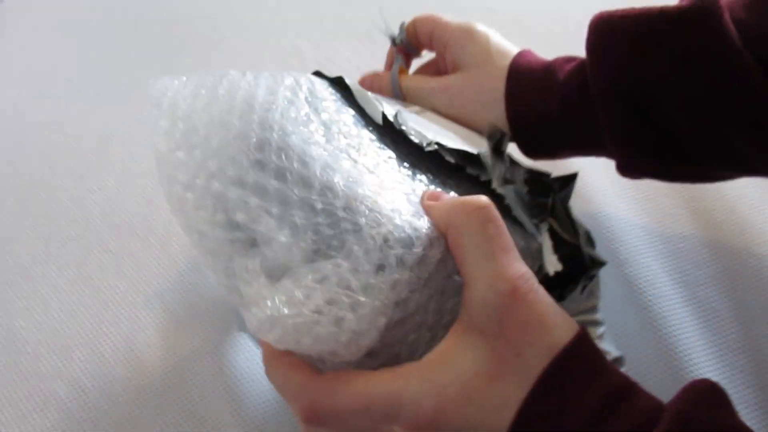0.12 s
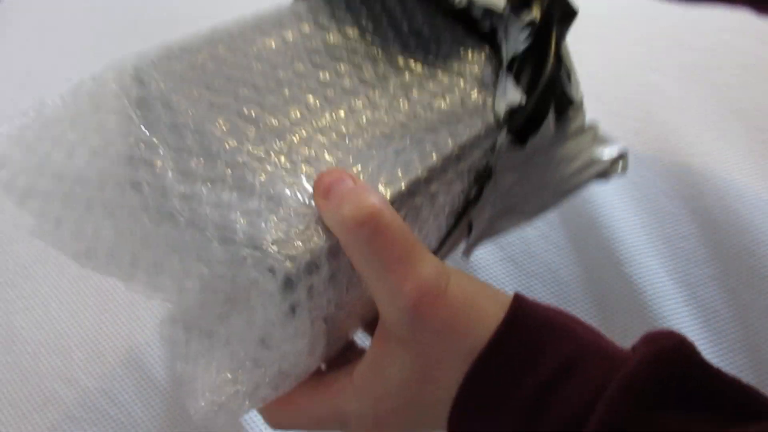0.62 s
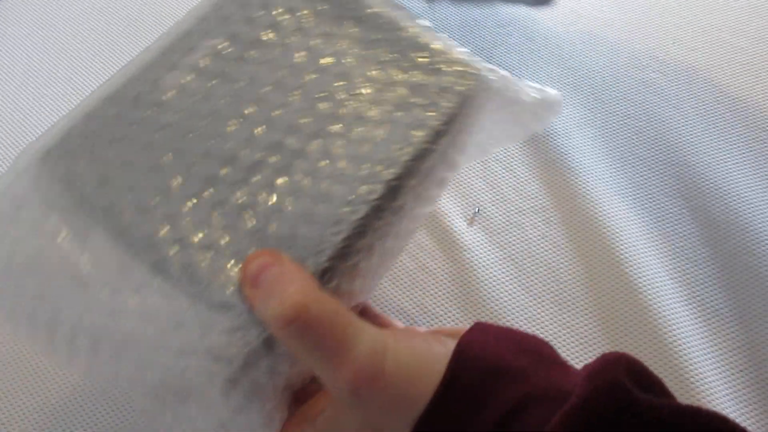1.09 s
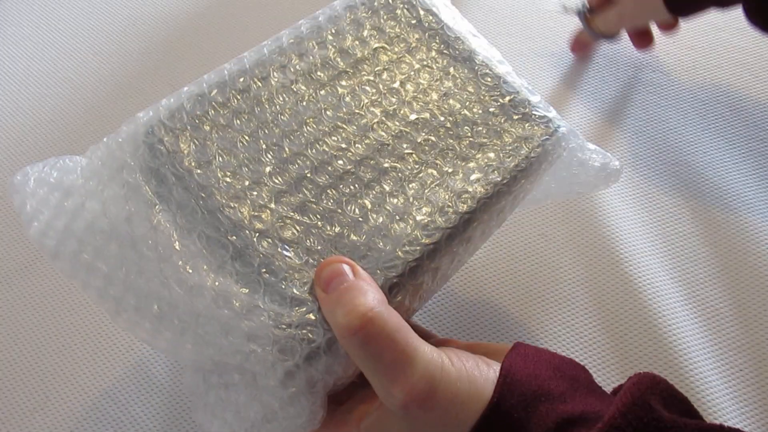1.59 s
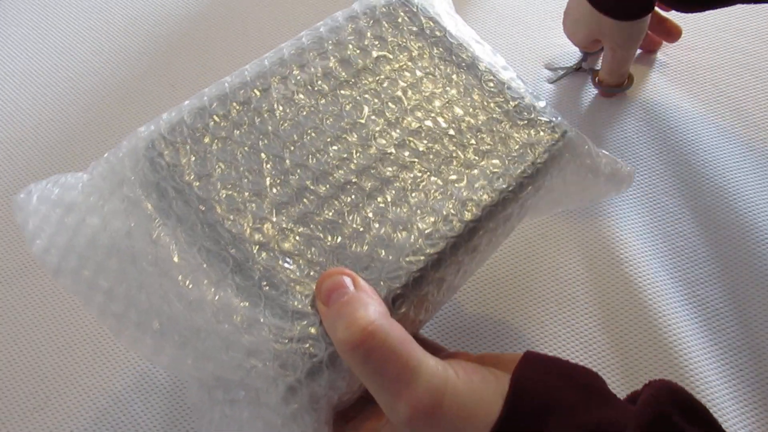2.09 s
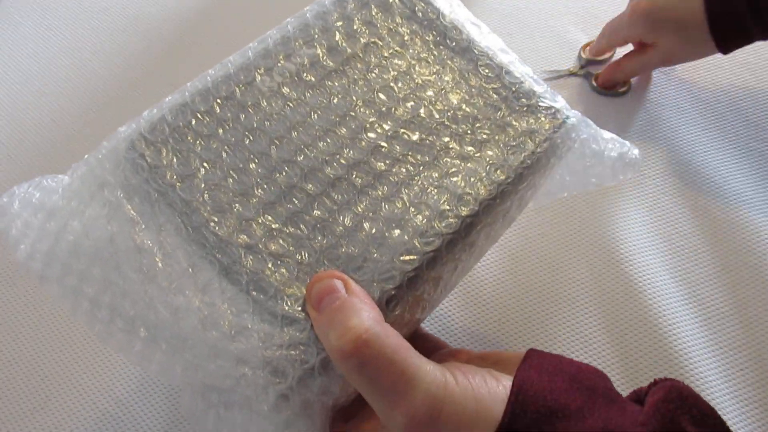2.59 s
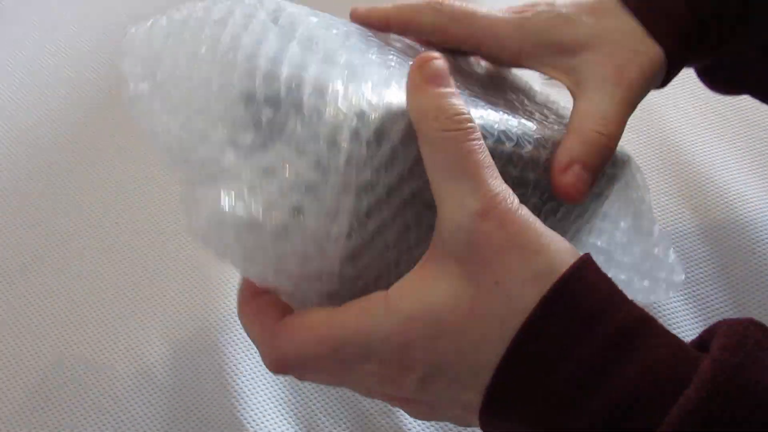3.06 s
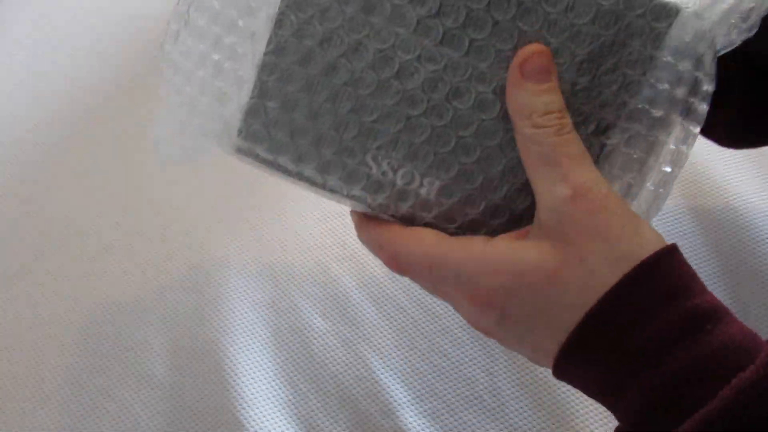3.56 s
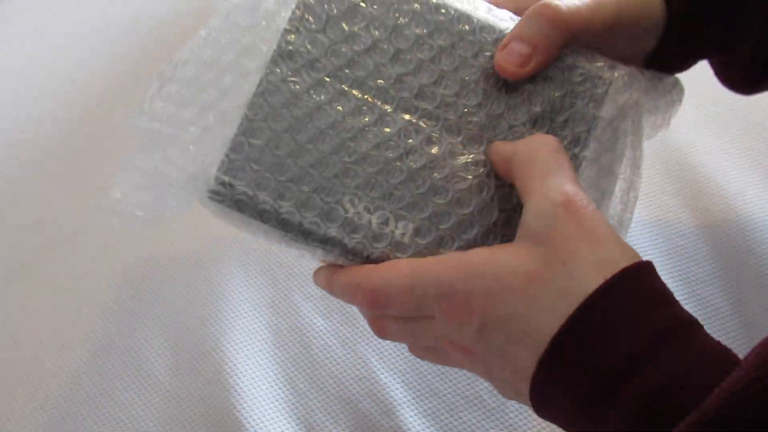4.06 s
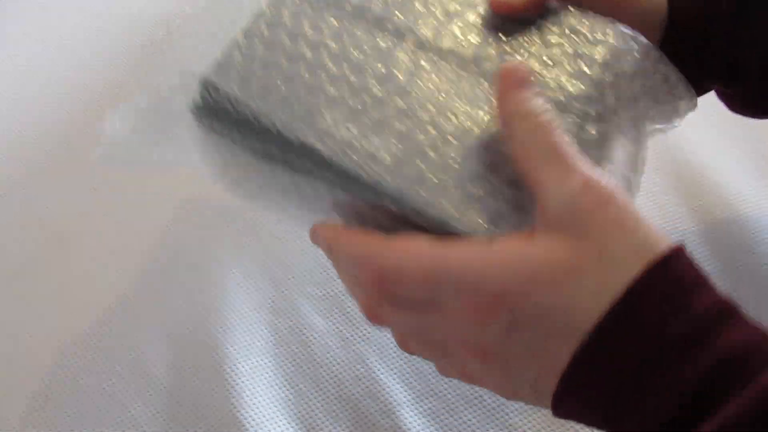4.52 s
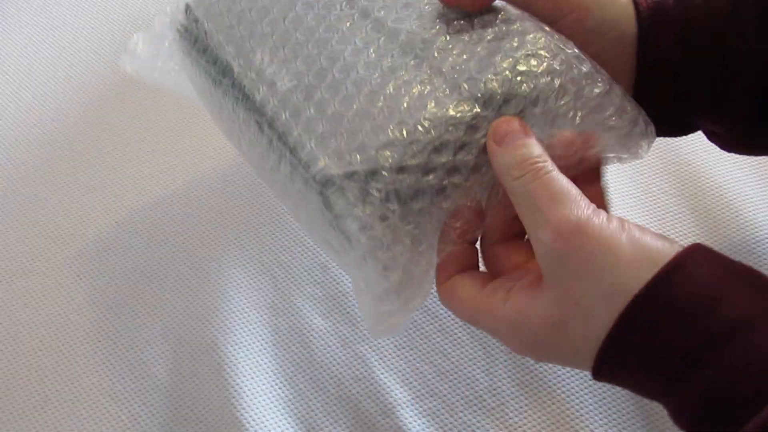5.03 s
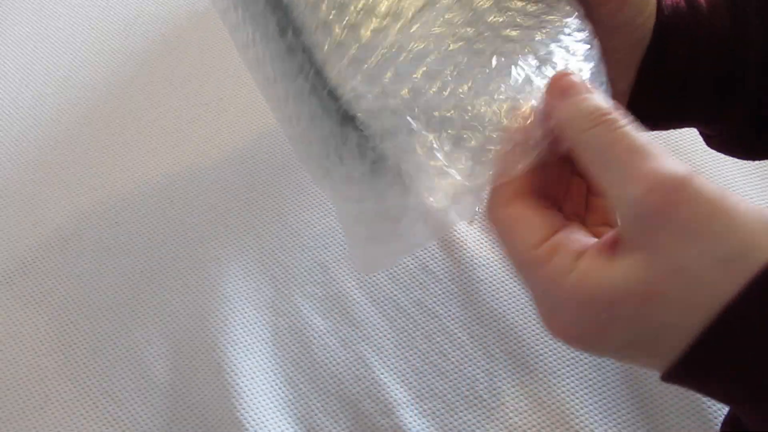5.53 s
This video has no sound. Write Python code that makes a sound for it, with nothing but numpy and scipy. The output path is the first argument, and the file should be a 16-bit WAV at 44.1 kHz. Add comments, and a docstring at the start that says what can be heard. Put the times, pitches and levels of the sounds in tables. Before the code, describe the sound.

Close-miked handling of plastic film in a small, dead room: busy crinkling and one very loud snap early, a quiet stretch of sparse ticks and light taps, then bursts of bubble wrap crackle, a dull knock, a very loud cluster of pops near four seconds, a brief lull and a last vigorous squeeze with strong snaps. Soft steady room hiss lies underneath.

```python
"""In a small furnished room a stiff plastic mailer is pulled off a bubble-wrapped box, small scissors slide
over the woven table top, then the box is turned in the hands. Film creases buckle as clumps of noise ringing
in many narrow bands, and flip as loud single snaps: a short ring, a tick and a rattle. Dull bumps are low
rings, the scissors a wavering whistle and a clink, a dragging finger a sinking band of noise.
Feedback delays make the room's answer, over a bed of shaped noise."""
import sys
import numpy as np
from scipy import signal
from scipy.fft import rfft, irfft, next_fast_len
from scipy.io import wavfile
from scipy.ndimage import uniform_filter1d

SR = 44100
rng = np.random.default_rng(int(sys.argv[2]) if len(sys.argv) > 2 else 0)


def volts_from_db(level):
    """Convert decibel levels to linear amplitude ratios."""
    exponent = np.asarray(level, float) / 20
    return 10 ** exponent


def generate_wav(sig):
    """Save sig (samples, or channels by samples) to the path in sys.argv[1] as 16-bit PCM at SR."""
    pcm = np.round(np.clip(np.atleast_2d(sig).T, -1, 1) * 32767).astype(np.int16)
    wavfile.write(sys.argv[1], SR, pcm)


N = 248724   # samples in the scene
STEP = 32   # samples between two values of the slow controls


def rms_one(x):
    """Scale a sound to an rms (average strength) of 1."""
    return x / np.sqrt(np.mean(x ** 2) + 1e-20)


def in_time(rows):
    """Draw straight lines between the rows of a table that starts with seconds: one value a sample."""
    s, *columns = np.transpose(rows)
    return [np.interp(np.arange(N) / SR, s, c) for c in columns]


def at_hz(points, hz):
    """Read a table of (Hz, dB) on a log-frequency axis."""
    table_hz, table_db = np.array(points).T
    return np.interp(np.log(hz), np.log(table_hz), table_db)


def drift(rate):
    """Slow random wandering with an rms of 1: noise smoothed twice at rate (Hz), made every 20 samples."""
    r = np.exp(-40 * np.pi * rate / SR)
    noise = rng.standard_normal(N // 20 + 2002)
    slow = signal.lfilter([1], [1, -2 * r, r * r], noise)[2000:]   # skip the filter's start
    return np.interp(np.arange(N) / 20, np.arange(len(slow)), rms_one(slow))


def ring(push, hz, t60):
    """A resonance: a unit click sets off a sine of height 1 that falls 60 dB in t60 seconds."""
    r = volts_from_db(-60 / (t60 * SR))
    w = 2 * np.pi * hz / SR
    return signal.lfilter([0, np.sin(w)], [1, -2 * r * np.cos(w), r * r], push + 1e-18)


def add(out, s, burst, db):
    """Lay a burst into the sound at its time in seconds and its peak level in dB."""
    at = round(s * SR)
    burst = burst[:N - at]
    out[at:at + len(burst)] += volts_from_db(db) * burst / np.max(np.abs(burst))


def crackle(per_s, size_db, clump_db, cycles, hiss):
    """Creases buckle in clumps; each shakes a few neighbouring patches of film that ring some cycles."""
    # Colour of the crackle around its three control levels. Each row: pitch in Hz, level in dB.
    film_colour = [(70, -39), (150, -26.5), (330, -12.5), (560, -21.5), (820, -13), (1500, -16),
                   (2300, -9.5), (4000, -14.5), (7000, -11), (11000, -30), (14500, -43.5)]
    mid_db, bright_db, low_db = handling()

    # until the mailer is off, at 1 s, it creases 1.8 times as often, each crease smaller to match
    crowd = np.where(np.arange(N) < 1.0 * SR, 1.8, 1)
    chance = per_s * crowd * volts_from_db(clump_db * drift(20)) / SR
    at = np.flatnonzero(rng.random(N) < chance)
    sizes = volts_from_db(size_db * np.minimum(rng.exponential(1, len(at)), 2.3)) / np.sqrt(crowd[at])
    crease_octave = rng.uniform(-.5, 8.5, len(at))   # octaves above 60 Hz

    grit = rng.standard_normal((2, N))
    slip = np.exp(-1 / (0.0003 * SR))   # a crease takes a fraction of a millisecond to flip
    out, creases = np.zeros(N), np.full(N, 1e-18)
    for hz in np.geomspace(70, 14000, num=32):
        octaves_off = np.log2(hz / 60) - crease_octave
        creases[at] = sizes * np.exp(-.5 * (octaves_off / 0.5) ** 2)
        flips = rms_one(grit[0] * signal.lfilter([1], [1, -slip], creases))
        struck = flips + hiss * grit[1]   # fingers rub between creases
        patch = rms_one(np.diff(ring(struck, hz, cycles / hz), prepend=0))

        # low and high patches each follow their own control level
        low_share = np.interp(np.log(hz), np.log([600, 1500]), [1, 0])
        bright_share = np.interp(np.log(hz), np.log([3200, 7000]), [0, 1])
        level_db = mid_db + low_share * (low_db - mid_db) + bright_share * (bright_db - mid_db)
        level_db += pocket_lift(hz) + at_hz(film_colour, hz) + 1.55 * drift(23.8)[::STEP]
        out += np.interp(np.arange(N) / STEP, np.arange(len(level_db)), volts_from_db(level_db)) * patch
    return out


def handling():
    """Middle, bright-crease and whole-sheet levels in dB: steady grip, squeezes and grabs summed as power."""
    # Steady working of the film between squeezes; tight film is brighter and less boomy.
    # Each row: time in seconds, level in dB, tautness in dB.
    grip = [(0, -38.5, -4), (.2, -42, -5.5), (.36, -35, -5), (.66, -37, -3.5), (.95, -37.5, -1.5),
            (1.1, -50.5, -9), (1.5, -58.5, -17), (2.3, -59.5, -3.5), (2.75, -60.5, -16), (2.9, -42, -2),
            (3.12, -38.5, 4), (3.38, -49, 0.5), (3.6, -45.5, -0.5), (3.85, -39.5, -1), (4.24, -43, 0.5),
            (4.37, -50.5, -3), (4.68, -44, -6), (4.79, -42, -6), (4.815, -50, -2), (4.93, -54, -6),
            (5.12, -36.5, 2.5), (5.36, -43, 6), (5.64, -41.5, 5)]
    # Squeezes and tugs, each a short swell of crackle.
    # Each row: time of the peak in seconds, peak level in dB, seconds to fall 10 dB, tautness in dB.
    squeezes = [(0.159, -35, 0.0051, 7), (.289, -31.5, 0.0466, -4.5), (.385, -33, .03, -8),
                (.475, -30.5, .08, -6), (.55, -32, .05, -8), (0.607, -34.5, 0.028, -1),
                (.72, -34, 0.0774, -5), (0.896, -26, 0.0545, -3), (1.022, -40, .02, -12),
                (1.32, -49, .03, -6), (1.38, -52, .015, -5), (1.44, -51, .03, -11), (1.615, -48, .025, -14),
                (1.68, -51, .02, -8), (1.76, -51, .1, 5), (1.885, -51, 0.04, -5.5),
                (2.11, -59, 0.53, -20.5), (2.53, -53.5, .06, 8), (3.047, -35.5, 0.0396, 4),
                (3.173, -26.5, 0.052, 2), (3.253, -35.5, 0.0334, 10), (3.302, -33.5, 0.0282, -2.5),
                (3.535, -40, 0.0289, 1), (3.643, -33.5, 0.1396, -1.5), (3.944, -35, 0.0455, -8),
                (3.7, -36.5, .03, 0), (4.581, -38.5, 0.0737, -4), (4.735, -42, .05, -3),
                (5.062, -30.5, 0.0911, 1), (5.218, -33, .07, -5), (5.3, -38, .02, -8),
                (5.424, -31, 0.0514, -0.5), (5.49, -31.5, 0.0364, 8), (5.529, -27.5, 0.0342, -3.5),
                (5.56, -32, 0.0347, -12), (5.607, -32, 0.0181, 10.5)]
    # A hand lands on the film or lets a fold go, so the crackle starts almost at once.
    # Each row: time of the peak in seconds, peak level in dB, seconds to fall 10 dB, tautness in dB.
    grabs = [(1.012, -40, .04, -10), (1.118, -46, .015, -8), (1.156, -48, .03, -4), (1.186, -39, .07, -8),
             (1.336, -46, .04, -4), (1.619, -43, .06, -6), (2.221, -48, .025, -6), (2.395, -55, .04, 0),
             (2.662, -54, .03, -4), (2.838, -47, .1, -10), (3.439, -44, .04, 4), (4.394, -41, .05, -4),
             (4.475, -35, .05, -2), (4.936, -42, .15, -3), (5.03, -32, .1, 0)]

    t = np.arange(0, N, STEP) / SR
    shares = np.array([[0], [1], [-1.008]])   # dB that each level gains per dB of tautness
    grip_db, grip_taut_db = (c[::STEP] for c in in_time(grip))
    power = volts_from_db(2 * (grip_db + shares * grip_taut_db))

    # the last value is the seconds to rise 10 dB: a share of the fall for squeezes, 3 ms for grabs
    swells = [(*row, 0.681 * row[2]) for row in squeezes] + [(*row, .003) for row in grabs]
    for s, peak_db, fall_s, taut_db, rise_s in swells:
        swell_db = peak_db - 10 * np.maximum((t - s) / fall_s, (s - t) / rise_s)
        power += volts_from_db(2 * swell_db) * volts_from_db(2 * shares * taut_db)
    mid_db, bright_db, low_db = 10 * np.log10(power)
    return mid_db, bright_db, low_db - 12.5   # the boom of the whole sheet is weaker


def pocket_lift(hz):
    """The air pocket between wrap and box lifts film ringing near its pitch, by some dB, while a grip holds it."""
    # Each row: start in seconds, end in seconds, first pitch in Hz, last pitch in Hz, lift in dB.
    pockets = [(0.038, 0.254, 755, 800, 6.5), (2.83, 3.0, 950, 900, 9), (3.0, 3.35, 875, 778, 6.5),
               (4.69, 4.8, 3000, 2200, 4), (0.22, 0.6, 2000, 2100, 3.5), (5.15, 5.26, 2300, 2200, 4),
               (4.926, 5.254, 800, 800, 3.5)]
    fade_s = 0.026
    t, lift = np.arange(0, N, STEP) / SR, 0
    for start, end, from_hz, to_hz, lift_db in pockets:
        held = np.clip(np.minimum(t - start, end - t) / fade_s + .5, 0, 1)
        centre = np.interp(t, [start, end], [from_hz, to_hz])
        lift = lift + lift_db * held * np.exp(-.5 * (np.log2(hz / centre) / .22) ** 2)   # width in octaves
    return lift


def snaps(cycles, tick_ms, rattle_db):
    """A crease flips: a ring of a few cycles at its own pitch, a bright tick and a short rattle after it."""
    # Single creases snapping over.
    # Each row: time in seconds, peak level of the ring in dB, its pitch in Hz, peak level of the tick in dB.
    single_snaps = [(0.1034, -24, 3140, -28), (0.1454, -23.5, 1790, -24), (0.1695, -20, 4520, -21),
                    (0.2376, -26, 2130, -34), (0.3224, -24, 2180, -17), (0.4455, -18, 2020, -17),
                    (0.4776, -18, 4200, -16), (0.602, -19.5, 1870, -9), (0.6108, -23, 2270, -14),
                    (0.7435, -7, 3200, -1.5), (0.748, -19.5, 1104, -11), (0.8477, -18, 4630, -15),
                    (1.0131, -18, 2260, -17), (1.1198, -29.5, 1800, -30), (1.1227, -24.5, 2580, -43.5),
                    (1.1865, -24.5, 2710, -17.5), (1.3365, -25, 3660, -24.5), (1.4314, -28, 2260, -45),
                    (1.5227, -38, 3620, -38), (1.5704, -38, 3770, -38.5), (1.6198, -25.5, 1640, -23),
                    (1.678, -38, 1900, -40), (1.779, -41.5, 2150, -36), (1.826, -40, 3000, -42),
                    (1.866, -38, 2500, -44), (1.8962, -33.5, 1550, -35.5), (1.9868, -45, 4300, -35),
                    (1.997, -35, 1800, -40), (2.109, -46, 1500, -39), (2.1275, -36, 2200, -44),
                    (2.1891, -31, 3000, -38), (2.2085, -39, 1500, -50), (2.2208, -32, 2350, -38),
                    (2.2688, -37, 2300, -38), (2.3252, -34.5, 1960, -55), (2.3875, -35, 3500, -45),
                    (2.3981, -38, 2060, -37), (2.4648, -38, 3040, -43), (2.5126, -40, 5000, -31),
                    (2.532, -32, 5140, -30), (2.5578, -28, 3240, -29), (2.6214, -31, 4500, -33),
                    (2.6579, -36, 2070, -44), (2.6637, -38, 1230, -27), (2.7167, -43, 900, -41),
                    (2.7448, -50.5, 4890, -26), (2.8031, -32, 4300, -39), (2.8408, -31, 900, -36),
                    (2.8576, -35, 860, -28), (2.8935, -30, 990, -26), (2.9288, -27, 2880, -23),
                    (2.984, -19, 3060, -20), (3.0152, -20, 2730, -17), (3.0519, -13.5, 3620, -11.5),
                    (3.0787, -20.5, 2640, -19.5), (3.1125, -17, 3540, -19), (3.2862, -19, 3680, -15.5),
                    (3.3051, -21, 2340, -13), (3.3352, -22, 3900, -27.5), (3.3694, -34, 3340, -25.5),
                    (3.4406, -21, 2720, -15), (3.4451, -23.5, 3900, -20), (3.5402, -23, 3000, -20.5),
                    (3.6338, -15.5, 2420, -19), (3.736, -18, 2500, -15.5), (3.8689, -26, 3830, -19),
                    (3.929, -1, 2547, -5.5), (3.9446, -3.5, 2670, -11.5), (3.9575, -6, 2540, -19),
                    (4.0341, -27, 3620, -25), (4.0471, -32, 4160, -17.5), (4.071, -23.5, 3550, -18.5),
                    (4.0878, -36, 4850, -12.5), (4.118, -31, 3790, -14), (4.137, -26, 4070, -16),
                    (4.1855, -36, 4070, -22.5), (4.2002, -24, 3820, -19.5), (4.2133, -28.5, 3670, -19),
                    (4.2271, -26, 4000, -23), (4.2407, -30.5, 3640, -20), (4.2455, -25, 3080, -19.5),
                    (4.293, -37, 2240, -22.5), (4.3053, -31, 3530, -25), (4.3389, -28, 4750, -28),
                    (4.3514, -35, 2260, -29), (4.3949, -26, 2880, -21), (4.407, -25, 2420, -20),
                    (4.4755, -28, 1400, -24), (4.514, -21, 3810, -22), (4.5344, -25, 4300, -24),
                    (4.5475, -33.5, 1420, -26), (4.5874, -28, 2200, -25), (4.6726, -34.5, 3470, -19),
                    (4.8489, -29, 2550, -25), (4.8778, -26.5, 3700, -45), (4.9998, -22, 4500, -21.5),
                    (5.0312, -15, 1300, -26), (5.0879, -19, 3250, -11), (5.1534, -10, 2300, -47),
                    (5.1977, -9, 2460, -9.5), (5.2675, -25, 3300, -26.5), (5.3652, -33, 2200, -19),
                    (5.5177, -5.5, 3470, -4), (5.5399, -10.5, 2800, -12), (5.5505, -19.5, 700, -6),
                    (5.5998, -22, 2330, -6), (5.6148, -12.5, 3500, -12.5)]
    # The box lid answers each snap. Each row: pitch in Hz, level against the ring in dB, seconds to fall 60 dB.
    lid = [(800, -23, .01), (1300, -22, .008)]

    out, t = np.zeros(N), np.arange(SR // 40) / SR
    treble = signal.butter(2, [4000, 12000], "band", fs=SR, output="sos")
    for s, ring_db, hz, tick_db in single_snaps + small_snaps():
        noise = rng.standard_normal((2, len(t)))
        flip = np.sin(2 * np.pi * hz * t) * (t < 1 / hz)   # the film swings over once
        push = flip + volts_from_db(rattle_db) * noise[0] * np.exp(-t / 0.00306)
        crease = np.sign(noise[0, 0]) * ring(push, hz, cycles / hz)   # flips either way
        add(out, s, crease, ring_db)
        for lid_hz, lid_db, t60 in lid:
            add(out, s, ring(crease, lid_hz, t60), ring_db + lid_db)
        fade = np.exp(-1000 * t / tick_ms) + volts_from_db(rattle_db - 14.0) * np.exp(-t / 0.0067)
        add(out, s, signal.sosfilt(treble, noise[1] * fade), tick_db)
    return out


def small_snaps():
    """Lesser snaps of the bubble wrap at random moments, set against the crackle's control levels there."""
    count, wrap_from_s = 110, 2.8   # from then on the box turns in its bubble wrap
    over_crackle_db, spread_db = 11.5, 4
    mid_db, bright_db, _ = handling()
    when, octave, ring_luck, tick_luck = rng.random((count, 4)).T
    first = wrap_from_s * SR
    at = (first + when * (N - 1 - first)).astype(int)
    ring_over_db, tick_over_db = over_crackle_db + spread_db * (2 * np.array([ring_luck, tick_luck]) - 1)
    ring_db = mid_db[at // STEP] + ring_over_db - 5   # mostly tick, with a weak ring
    tick_db = bright_db[at // STEP] + tick_over_db
    return list(zip(at / SR, ring_db, 1800 * 2 ** (1.315 * octave), tick_db))


def bumps(cycles, contact_ms):
    """A soft contact sets the box and its air cushion ringing low, with a short-lived overtone."""
    # Dull bumps of box and hands. Each row: time in seconds, peak level in dB, pitch in Hz.
    dull_bumps = [(0.285, -26, 700), (0.583, -28.5, 431), (0.892, -25, 443), (0.905, -23, 326),
                  (1.12, -34, 494), (1.44, -39.5, 242), (1.626, -39.5, 330), (2.108, -31, 435),
                  (2.268, -37.5, 338.4), (2.645, -37, 446), (2.847, -36.5, 540), (3.049, -37, 128),
                  (3.176, -13.5, 778), (3.181, -22, 321), (3.418, -30, 421), (3.639, -30.5, 347),
                  (3.739, -33, 307), (3.913, -39.5, 260), (3.929, -22.5, 343), (3.945, -32.5, 200),
                  (3.958, -31.5, 208.4), (4.475, -25, 360), (5.031, -14.5, 908), (5.047, -37.5, 470),
                  (5.075, -36, 305), (5.152, -24, 780), (5.197, -21, 497), (5.431, -25, 448),
                  (5.538, -21, 250), (5.6, -28, 200)]
    out, t = np.zeros(N), np.arange(SR // 10) / SR
    for s, peak_db, hz in dull_bumps:
        push = (1 + rng.standard_normal(len(t))) * np.exp(-1000 * t / contact_ms)
        overtone = ring(push, 1.9 * hz, cycles / (4 * hz))
        body = ring(push, hz, cycles / hz) + .35 * overtone
        add(out, s, np.diff(body, prepend=0), peak_db)   # a small body radiates no steady push
    return out


def scissors(width_hz):
    """A wavering narrow whistle from the slide, and one thin clink of steel."""
    # A faint whistle as the scissors slide over the weave, its pitch following the speed.
    # Each row: time in seconds, pitch in Hz, level in dB.
    slide = [(2.035, 10200, -70), (2.08, 11970, -61), (2.14, 12300, -61.5), (2.215, 13000, -61),
             (2.29, 11600, -62), (2.325, 11400, -63), (2.37, 10300, -70)]
    # The blades touch. One row: time in seconds, peak level in dB, pitch in Hz, seconds to fall 60 dB.
    clink = (1.272, -57, 10600, .16)
    hz, level_db = in_time(slide)
    t = np.arange(N) / SR
    sliding = (t > slide[0][0]) & (t < slide[-1][0])
    phase = 2 * np.pi * np.cumsum(hz + 120 * drift(30)) / SR   # the hand moves in small jerks
    core = drift(width_hz) * np.cos(phase) + drift(width_hz) * np.sin(phase)
    halo = uniform_filter1d(rng.standard_normal(N), size=26) * np.cos(phase)   # uneven threads blur the pitch
    out = sliding * volts_from_db(level_db) * (core + volts_from_db(-4.0) * rms_one(halo))
    s, peak_db, clink_hz, t60 = clink
    add(out, s, ring(t[:SR // 2] == 0, clink_hz, t60), peak_db)
    return out


def drag(width_hz):
    """Friction noise in one narrow resonance that sinks in pitch."""
    # A finger drags off the wrap and the hollow under it sinks.
    # Each row: time in seconds, pitch in Hz, level in dB.
    finger = [(4.715, 1150, -60), (4.735, 1040, -40.5), (4.77, 800, -43), (4.8, 520, -45), (4.81, 480, -62)]
    hz, level_db = in_time(finger)
    t = np.arange(N) / SR
    phase = 2 * np.pi * np.cumsum(hz) / SR
    hollow = drift(width_hz) * np.cos(phase) + drift(width_hz) * np.sin(phase)
    return (t > finger[0][0]) * (t < finger[-1][0]) * volts_from_db(level_db) * hollow


def room(x):
    """Echoes between the walls: ten feedback delays, weaker and duller on every round."""
    t60_s, wall_cut_hz = 0.1068, 2770
    size = next_fast_len(N + SR)
    w = 2 * np.pi * np.arange(size // 2 + 1) / size
    dull = 1 / (1 + 1j * w * SR / (2 * np.pi * wall_cut_hz))
    walls = 0
    for k, lag_s in enumerate(rng.uniform(.005, .03, size=10)):
        loop = volts_from_db(-60 * lag_s / t60_s) * dull * np.exp(-1j * w * lag_s * SR)
        walls = walls + (-1) ** k * loop / (1 - loop)   # the sum of all rounds
    return irfft(rfft(x, size) * walls, size)[:N]


def room_tone():
    """Steady air and microphone hiss: white noise given a colour by frequency."""
    # Colour of the hiss. Each row: frequency in Hz, level in dB before the whole is scaled.
    hiss_colour = [(15, -33), (25, 31), (462, 23.5), (543, -4.5), (1670, -2.5), (1910, 25.5), (3730, -43),
                   (11500, -22.5), (15000, -41)]
    hz = np.maximum(np.arange(N // 2 + 1) * SR / N, 10)
    spectrum = rfft(rng.standard_normal(N)) * volts_from_db(at_hz(hiss_colour, hz))
    return volts_from_db(-64.5) * rms_one(irfft(spectrum, N))


def scene():
    """Film, box and scissors close to the microphone, with room and room tone."""
    near = crackle(per_s=2300, size_db=3.0, clump_db=2.5, cycles=9.234, hiss=0.802)
    near = near + snaps(cycles=7.0, tick_ms=0.4, rattle_db=-9.0)
    near = near + bumps(cycles=9.0, contact_ms=1.43)
    near = near + scissors(width_hz=230) + drag(width_hz=110)
    return (near + volts_from_db(-15) * room(near) + room_tone())[None]


def roll_off(x):
    """The treble ends steeply here."""
    return signal.sosfilt(signal.butter(12, 16340, fs=SR, output="sos"), x)


def record(dry):
    """The microphone drops the deepest bass, the highest peaks are rounded and the top is cut."""
    thin = signal.sosfilt(signal.butter(2, 28, "high", fs=SR, output="sos"), dry)
    rounded = 1.3 * np.tanh(thin / 1.3)
    top_cut = signal.cheby2(14, 48, 15300, fs=SR, output="sos")   # 48 dB down from 15300 Hz up
    finished = signal.sosfilt(top_cut, rounded)
    return roll_off(finished)


dry = scene()
out = record(dry)
generate_wav(out)
```